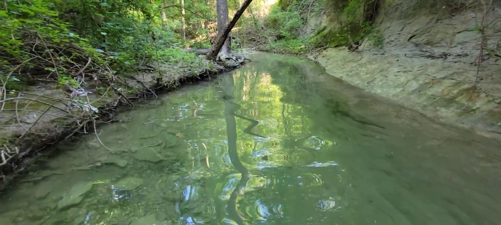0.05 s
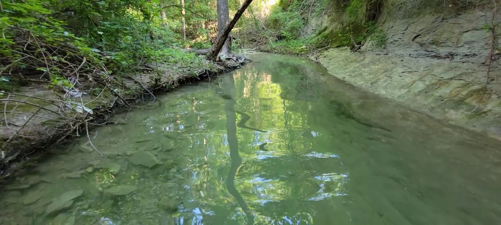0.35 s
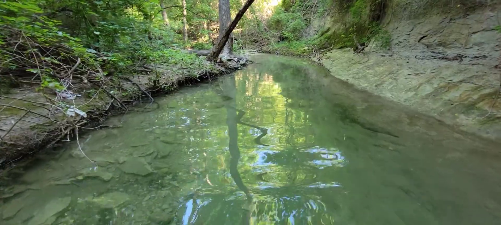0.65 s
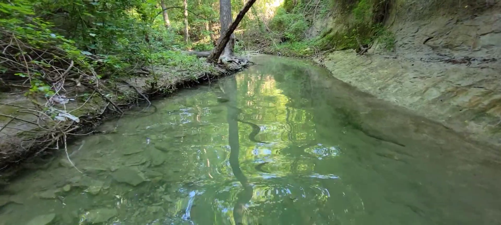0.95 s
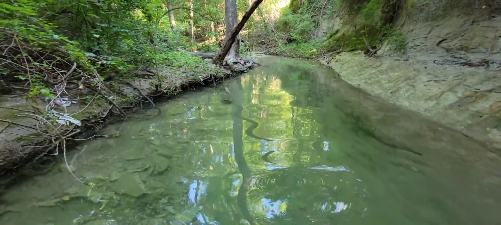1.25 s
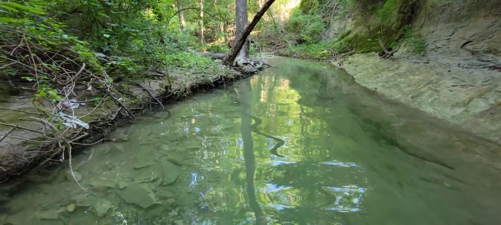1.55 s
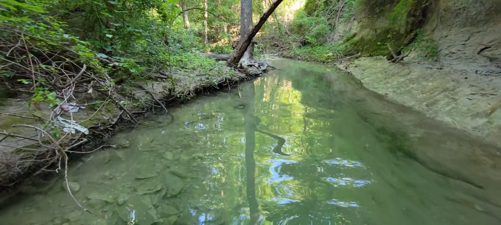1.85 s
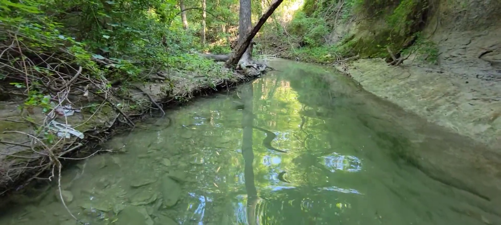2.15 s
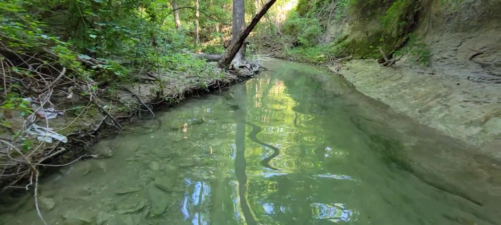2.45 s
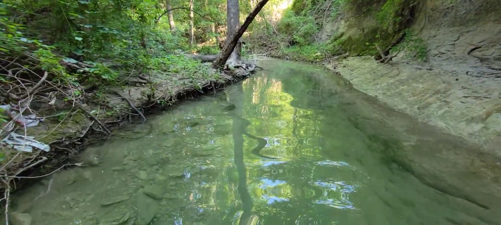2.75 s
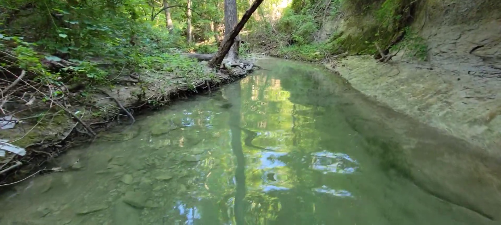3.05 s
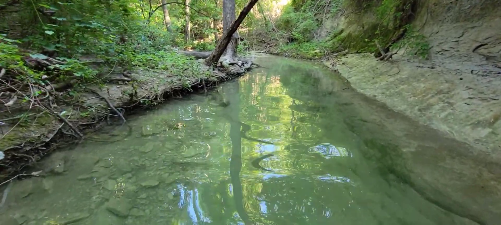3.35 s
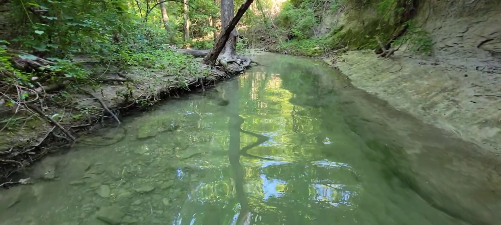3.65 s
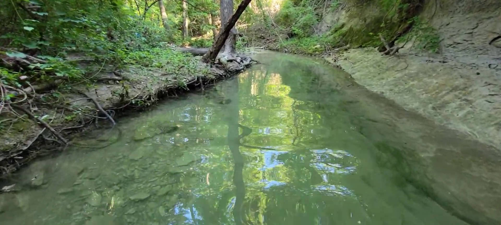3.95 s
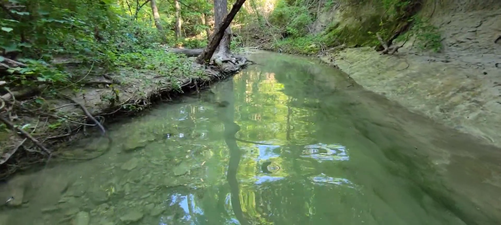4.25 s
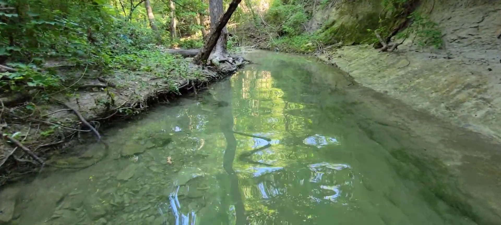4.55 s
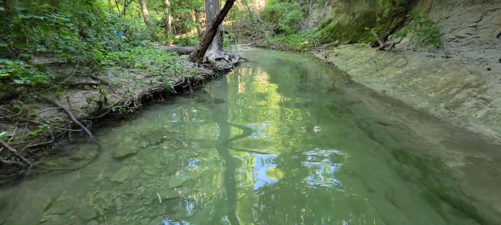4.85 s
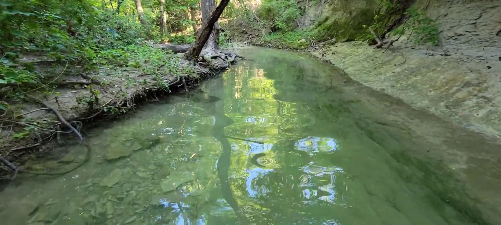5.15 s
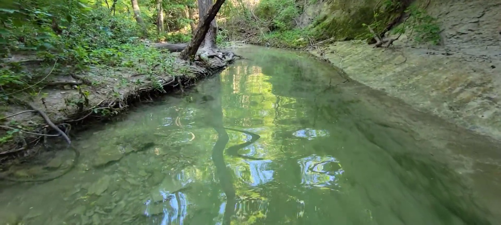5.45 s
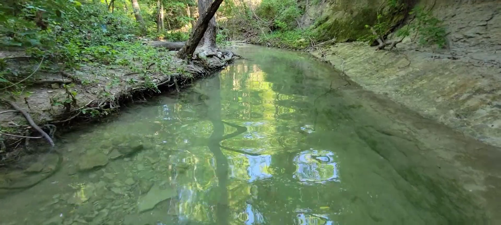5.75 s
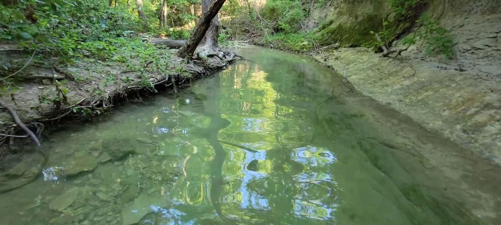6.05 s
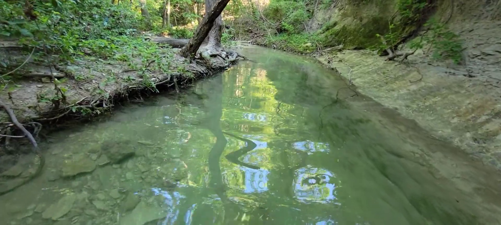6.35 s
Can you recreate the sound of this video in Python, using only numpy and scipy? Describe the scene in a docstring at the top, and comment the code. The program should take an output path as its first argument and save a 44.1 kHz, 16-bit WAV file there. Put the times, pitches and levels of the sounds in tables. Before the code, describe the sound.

Someone wades slowly through shallow water with uneven sloshes, bubbly plops and small splashes over a faint trickle and low rumble.

```python
"""A shallow creek between rock banks: slow wading, close to a hand-held stereo microphone.
Each leg pushes a wave that folds air into gurgles and ringing bubbles. Thrown water slaps the surface,
drops fall back between the steps, and once two stones clack together underfoot, to the right.
The banks give a short echo. A far bird whistles; a low rumble and a faint trickle lie under it all."""
import sys
import numpy as np
from scipy import signal
from scipy.fft import rfft, irfft, next_fast_len
from scipy.io import wavfile
from scipy.ndimage import uniform_filter1d, map_coordinates

SR = 44100
rng = np.random.default_rng(int(sys.argv[2]) if len(sys.argv) > 2 else 0)


def wrap_up_sound(samples):
    """Save the sound to the file named by the first command line argument, as 16-bit audio."""
    columns = np.atleast_2d(samples).T
    # keep every value between -1 and 1, then stretch to whole-number steps
    tamed = np.clip(columns, -1, 1)
    steps = np.round(tamed * 32767).astype(np.int16)
    wavfile.write(sys.argv[1], SR, steps)


N = 283122


def amp(db):
    """Decibels to gain."""
    return 10 ** (np.asarray(db) / 20)


def unit(x):
    """Scale to rms 1."""
    return x / np.sqrt(np.mean(x ** 2) + 1e-20)


def along(points, hz):
    """(frequency [Hz], value) points read on a log axis."""
    freqs, values = np.transpose(points)
    return np.interp(np.log(hz + 1), np.log(freqs + 1), values)


def curve(rows, column):
    """One value per sample from a column of a time table."""
    rows = np.asarray(rows)
    return np.interp(np.arange(N) / SR, rows[:, 0], rows[:, column])


def filtered(x, response):
    """x times a complex response of frequency."""
    size = next_fast_len(N + SR // 2)
    return irfft(rfft(x, size) * response(np.fft.rfftfreq(size, 1 / SR)), size)[..., :N]


def coloured(x, colour):
    """x filtered by (frequency [Hz], gain [dB]) points."""
    return filtered(x, lambda hz: amp(along(colour, hz)))


def add(track, s, sound):
    """Mix a sound into a track at s seconds."""
    start = int(np.clip(round(s * SR), 0, N - 1))
    track[..., start:start + sound.shape[-1]] += sound[..., :N - start]


def rush(colour, side_db, patchy_db):
    """Mid-side stereo noise of rms 1 with short patches of random gain."""
    spectra = signal.stft(rng.standard_normal((2, N)), nperseg=256)[2]
    patches = uniform_filter1d(rng.standard_normal(spectra.shape[1:]), size=5, axis=0)
    patches = unit(uniform_filter1d(patches, size=5, axis=1))
    pair = signal.istft(spectra * amp(patchy_db * patches), nperseg=256)[1][:, :N]
    mid, side = coloured(pair, colour)
    return unit(np.array([mid + amp(side_db) * side, mid - amp(side_db) * side]))


def bubble(hz, t60, rise, lag_s, swell_cycles):
    """An air pocket swells and rings, its pitch climbing as it nears the surface. Left lags by lag_s."""
    delay = np.array([[lag_s], [-lag_s]]) / 2 + abs(lag_s) / 2
    t = np.maximum(np.arange(int(t60 * SR) + 16) / SR - delay, 0)
    swell = 1 - np.exp(-t * hz / swell_cycles)
    phase = 2 * np.pi * hz * (t + rise * t * t / (2 * t60))
    return swell * amp(-60 * t / t60) * np.sin(phase)


def swarm(level_db, low_hz, high_hz, cycles, rise, scatter_db, spread_s, count):
    """Many bubbles following a level curve: stirred water makes both more and louder ones."""
    density = amp(level_db - level_db.max())
    share = np.cumsum(density) / density.sum()
    track = np.zeros((2, N))
    for k, (when, pitch, life, climb, loud, place) in enumerate(rng.random((count, 6))):
        onset = min(np.searchsorted(share, (k + when) / count), N - 1)
        hz = low_hz * (high_hz / low_hz) ** pitch
        t60 = cycles / hz * 2 ** (2 * life - 1)
        edge = np.sin(np.pi * pitch) ** .5  # the largest and smallest bubbles are weak
        gain = edge * amp(scatter_db * loud ** 2) / np.sqrt(density[onset])
        ring = bubble(hz, t60, rise * climb, spread_s * (2 * place - 1), swell_cycles=11)
        add(track, onset / SR, gain * ring)
    return unit(track) * amp(level_db)


# each push of a leg, close to the microphone:
# (crest time [s], stir level [dB], spray level [dB], build-up [s], side [-1 right, 1 left])
LEG_PUSHES = [(0.36, -37.5, -44.5, .2, -1.15), (1.0, -33, -40, .11, 0.24), (1.3, -41, -51, .15, -0.3),
              (1.59, -34, -46, .6, -0.72), (2.24, -43.5, -47.5, .3, -0.46), (2.48, -44, -53.5, .1, -0.98),
              (3.75, -29, -42, .24, -0.48), (4.48, -41, -45, .17, -0.91), (4.9, -40, -48, .6, -0.86),
              (6.17, -35, -40.5, .08, -0.096), (6.29, -33.5, -41, .2, 0.18)]
BUILD_DB = 17  # swell over the build-up


def strides(column, calm_db, settle_db_per_s):
    """Level in dB of the stir or the spray: it builds to each crest, then settles towards calm water."""
    power = amp(calm_db) ** 2
    for push in LEG_PUSHES:
        crest_s, build_s = push[0], push[3]
        since = np.arange(N) / SR - crest_s
        drop_db = np.maximum(-since * BUILD_DB / build_s, since * settle_db_per_s)
        power += amp(push[column] - drop_db) ** 2
    return 10 * np.log10(power)


# swish of the wave at the leg: (frequency [Hz], level [dB])
SWISH_COLOUR = [(250, -30), (500, 15.5), (1000, 4), (1900, 14.5), (2800, -6), (7000, -13), (12000, -25)]


def sloshes(stir_db, spray_db):
    """Big pockets gurgle behind the leg, smaller ones fill the wave, the finest fizz in the spray."""
    gurgle = swarm(stir_db - 8.5, 345.8, 1153, cycles=30.3, rise=1, scatter_db=7,
                   spread_s=.0002, count=210)
    slosh = swarm(stir_db - 4, 663.5, 2498, cycles=24.7, rise=1.035, scatter_db=14.5,
                  spread_s=.00036, count=620)
    fizz = swarm(spray_db, 1900, 9000, cycles=9, rise=.3, scatter_db=11, spread_s=.0002, count=3600)
    fizz = coloured(fizz, [(3000, -3.5), (8000, -10)])
    push_db = stir_db - stir_db.max()  # only a hard push makes the wave swish
    swish = amp(stir_db + .25 * push_db - 8.5) * rush(SWISH_COLOUR, side_db=-3, patchy_db=4)
    return gurgle + slosh + fizz + swish


# the loudest bubbles, at close range: (time [s], level [dB], pitch [Hz], t60 [s])
NEAR_BUBBLES = [(0.005, -35, 450, 0.3), (0.081, -19, 2820, 0.0076), (0.229, -35, 4220, .025),
                (0.252, -28.5, 366.5, 0.25), (0.285, -27, 1660, .035), (0.317, -25, 553, 0.21),
                (0.349, -19.5, 478, 0.065), (0.431, -31, 1605, 0.086), (0.449, -32, 508, 0.15),
                (0.523, -31, 1176, 0.058), (0.695, -34.5, 1105, .06), (0.913, -24, 3560, 0.018),
                (1.002, -18, 840, 0.025), (1.004, -18, 1750, 0.024), (1.244, -16, 1425, 0.024),
                (1.282, -24, 1540, 0.029), (1.296, -29.5, 535, 0.064), (1.368, -28.5, 944, 0.046),
                (1.441, -27, 4500, .02), (1.622, -20.5, 844, 0.036), (1.677, -21.5, 990, 0.026),
                (2.423, -29, 960, 0.043), (2.457, -31.5, 798, 0.079), (2.459, -34.5, 468, 0.16),
                (2.538, -26.5, 666, 0.051), (2.669, -33, 873, 0.06), (2.814, -24, 1750, 0.036),
                (2.816, -31, 936, 0.079), (3.035, -23.5, 2150, 0.028), (3.104, -26, 1640, 0.059),
                (3.297, -28, 3520, 0.019), (3.512, -20, 1420, 0.019), (3.558, -26, 361, 0.41),
                (3.75, -19.5, 1180, 0.052), (3.799, -25.5, 2670, 0.022), (3.803, -26, 503, 0.19),
                (3.848, -22, 1090, 0.033), (3.955, -17, 1930, 0.019), (4.297, -25, 1560, 0.026),
                (4.496, -18, 1090, 0.039), (4.535, -24.5, 4820, 0.0072), (4.661, -23, 1580, 0.029),
                (4.739, -26.5, 510, 0.13), (4.823, -12.5, 845, 0.012), (4.938, -23, 666, 0.051),
                (5.13, -30.5, 530, 0.15), (5.131, -24.5, 1625, 0.022), (5.43, -21.5, 1570, 0.017),
                (5.452, -18.5, 2660, 0.0087), (5.524, -29.5, 1600, 0.026), (6.099, -23, 1495, 0.086),
                (6.144, -20, 2200, 0.032), (6.198, -20, 1080, 0.07), (6.317, -22.5, 339, 0.059),
                (6.377, -15, 1818, 0.026)]


def plops():
    """Single bubbles, each from its own spot around the legs, pinch off at once and ring out."""
    track = np.zeros((2, N))
    for (s, db, hz, t60), place in zip(NEAR_BUBBLES, rng.standard_normal(len(NEAR_BUBBLES))):
        add(track, s, amp(db) * bubble(hz, t60, rise=.282, lag_s=.00004 * place, swell_cycles=.6))
    return track


# hollows just behind the legs: (time [s], level [dB], first pitch [Hz], last pitch [Hz], length [s])
WAKE_HOLLOWS = [(0.236, -18.5, 954, 1540, 0.015), (0.253, -25, 1130, 1620, .019),
                (0.855, -29, 573, 710, 0.035), (0.907, -34.5, 304, 377, 0.069),
                (0.963, -32, 430, 810, 0.039), (1.023, -28.5, 632, 785, 0.05),
                (1.444, -28, 1776, 2260, 0.038), (1.579, -18, 906, 1270, 0.027),
                (3.421, -25, 1070, 2150, 0.026), (3.668, -24, 520, 780, 0.027),
                (3.694, -24.5, 955, 1900, 0.019), (4.444, -31.5, 488, 780, 0.038),
                (4.775, -28, 407, 715, 0.047), (4.834, -35.5, 327, 550, 0.053),
                (4.876, -27, 573, 1240, 0.021), (6.31, -22, 805, 1240, 0.028)]


def gulps():
    """A hollow closes over: its note swells, wavers and climbs ever faster as the cavity shrinks."""
    track = np.zeros((2, N))
    for s, db, first_hz, last_hz, length in WAKE_HOLLOWS:
        progress = np.linspace(0, 1, int(length * SR))
        waver = unit(uniform_filter1d(rng.standard_normal(len(progress)), size=90))
        hz = first_hz * (last_hz / first_hz) ** (progress ** 2) * (1 + .07 * waver)
        swell = np.sin(np.pi * progress ** .88) ** 2
        add(track, s, amp(db) * swell * np.sin(2 * np.pi * np.cumsum(hz) / SR))
    return track


# thrown water landing nearby, and a foot going under: (time [s], level [dB])
SLAP_HITS = [(0.239, -39), (0.999, -41.5), (1.992, -39), (3.625, -37.5), (4.655, -39.5), (6.064, -36.5)]
PLUNGE_HITS = [(0.999, -29), (1.448, -32), (1.62, -32), (3.68, -30), (3.748, -33), (6.319, -25.5)]
# their spectra: (frequency [Hz], level [dB])
SLAP_SPECTRUM = [(700, -9), (2000, 4.5), (4200, 2.5), (6500, -4), (12000, -38)]
PLUNGE_SPECTRUM = [(200, -18), (330, -5.5), (1100, 4.5), (2100, 5), (3000, -26.5)]


def splashes():
    """Thrown water slaps the surface in a bright burst; a plunging foot drives air under in a deep one."""
    return burst(SLAP_HITS, SLAP_SPECTRUM, t60=.17) + burst(PLUNGE_HITS, PLUNGE_SPECTRUM, t60=.15)


def burst(hits, colour, t60):
    """Patchy noise that starts at each hit on the water and dies away."""
    envelope, t = np.zeros(N), np.arange(SR // 5) / SR
    for s, db in hits:
        add(envelope, s, amp(db - 60 * t / t60))
    return envelope * rush(colour, side_db=-4.5, patchy_db=1.5)


def drips(stir_db):
    """Water running off the legs falls back in small rising chirps, also between steps."""
    return swarm(.5 * stir_db - 35, 750, 2300, cycles=45, rise=1.1, scatter_db=5, spread_s=.0002, count=65)


# droplets near the microphone: (time [s], level [dB])
DROPLETS = [(0.439, -31), (0.815, -35), (1.58, -29.5), (1.614, -29), (2.6486, -32.5), (2.843, -37),
            (3.31, -36), (3.865, -29.5), (4.9353, -33), (6.059, -34.5), (6.131, -30)]


def ticks(t60=.009):
    """Tiny droplets burst in a bright click."""
    track, t = np.zeros((2, N)), np.arange(SR // 50) / SR
    for s, db in DROPLETS:
        add(track, s, amp(db - 3 - 60 * t / t60) * rng.standard_normal((2, len(t))))
    return coloured(track, [(1500, -31), (5000, 10), (13000, 6)])


# the finest hiss, close and dry: (time [s], level [dB])
HISS_LEVEL = [(0.0, -51), (0.72, -61), (1.29, -55), (1.9, -63), (2.1, -55.5), (2.38, -57), (2.62, -64),
              (3.25, -65.5), (3.81, -51), (4.09, -61.5), (4.6, -51.5), (4.85, -60), (6.06, -63),
              (6.24, -45.5), (6.42, -63)]
# its spectrum: (frequency [Hz], level [dB])
HISS_SPECTRUM = [(3000, -5), (6000, 7.5), (9000, 2), (12500, 7.5), (15500, 5)]


def crackle(pops_per_s=900, t60=.0078):
    """Countless tiny pops over a hiss, swelling and fading together."""
    sizes = (rng.random(N) < pops_per_s / SR) * amp(7.5 * rng.standard_normal(N).clip(-3, 2.5))
    t = np.arange(SR // 400) / SR
    envelope = signal.fftconvolve(sizes, amp(-60 * t / t60))[:N]
    pops = unit(coloured(envelope * rng.standard_normal((2, N)), HISS_SPECTRUM))
    hiss = rush(HISS_SPECTRUM, side_db=-9, patchy_db=7.5)
    return amp(curve(HISS_LEVEL, 1)) * (amp(.5) * pops + hiss)


# ring of the stones underfoot: (frequency [Hz], level [dB], t60 [s])
STONE_MODES = [(1070, -19.5, 0.033), (2160, -13, 0.013), (2540, -11, .011), (2850, -2.5, 0.015),
               (3720, -9.5, 0.011), (4310, -4.5, 0.0076), (4700, -13, 0.0073), (6000, -12, 0.0094),
               (11950, -2.5, 0.0022)]


def stones(clack_s=5.8314):
    """One stone tips against another: all modes start with the blow; water and banks scatter the clack."""
    track, t = np.zeros((2, N)), np.arange(SR // 4) / SR
    ring = sum(amp(db + rng.standard_normal((2, 1)) - 60 * t / t60) * np.sin(2 * np.pi * hz * t)
               for hz, db, t60 in STONE_MODES)
    grit = rush(SLAP_SPECTRUM, side_db=1, patchy_db=.5)[:, :len(t)]
    contact = amp(-8.5 - 60 * t / .0089)
    scatter = amp(-27 - 60 * t / .15)
    attack = 1 - np.exp(-t / .00027)
    add(track, clack_s, attack * (amp(-2.5) * ring + (contact + scatter) * grit))
    return track


# echo of the rock banks, heard from in the creek: (frequency [Hz], t60 [s])
BANK_DECAY = [(200, 0.54), (1000, 0.24), (4000, 0.085), (12000, 0.061)]


def banks(x):
    """Water surface and rock answer; each stretch of the walk has its own echo."""
    wet, hop = np.zeros((2, N)), SR // 4
    for start in range(0, N, hop):
        hz, t, spectra = signal.stft(rng.standard_normal((2, SR // 3)), SR, nperseg=256)
        decay = amp(-60 * t / along(BANK_DECAY, hz)[:, None])
        tail = signal.istft(spectra * decay, SR, nperseg=256)[1]
        tail *= 1 + 2.5 * np.exp(-np.arange(tail.shape[1]) / SR / .035)  # the wader's body is nearest
        crossfade = np.clip(1 - abs(np.arange(N) - start) / hop, 0, 1)
        first = max(start - hop, 0)
        stretch = (x[0] * crossfade)[None, first:start + hop]
        add(wet, first / SR, signal.fftconvolve(stretch, tail / np.linalg.norm(tail[0]), axes=1))
    return wet


# a far bird's phrase: (offset [s], length [s], first pitch [Hz], last pitch [Hz], level [dB])
BIRD_PHRASE = [(0, .12, 2500, 1880, -43.5), (.18, .11, 3480, 3420, -54.5), (.29, .115, 4200, 5600, -55)]


def bird(start_s=4.125, period_s=.51, count=4):
    """A far songbird repeats three whistles, falling, held and rising, smeared by the banks."""
    song = np.zeros((2, N))
    for phrase_s in start_s + period_s * np.arange(count):
        for s, length, first_hz, last_hz, db in BIRD_PHRASE:
            progress = np.linspace(0, 1, int(length * SR))
            hz = first_hz * (last_hz / first_hz) ** progress * (1 + .0082 * rng.standard_normal())
            whistle = np.sin(np.pi * progress) * np.sin(2 * np.pi * np.cumsum(hz) / SR)
            add(song, phrase_s + s, amp(db) * whistle)
    return (song + banks(song)) / 2


# the steady ambience of the place: (frequency [Hz], level [dB])
RUMBLE_COLOUR = [(20, -23), (58, -3.5), (80, 0.5), (130, -1), (160, -10.5), (400, -23), (900, -58.5)]
TRICKLE_COLOUR = [(200, -4), (400, 2), (1200, 2.5), (2500, -2), (5000, -21), (9000, -25.5), (15500, -61)]


def ambience():
    """A low rumble with a faint hum in it, and the far trickle of the creek."""
    rumble = amp(-43) * rush(RUMBLE_COLOUR, side_db=-29, patchy_db=1)
    hum = amp(-48.5) * np.sin(2 * np.pi * 59 * np.arange(N) / SR)
    trickle = amp(-45.5) * rush(TRICKLE_COLOUR, side_db=-1, patchy_db=3)
    return rumble + hum + trickle


def placed(x, side, louder_db=4.5, earlier_s=.0003):
    """A sound to one side (-1 right, 1 left) is louder and earlier at the nearer microphone port."""
    nearness = side * np.array([[.5], [-.5]])
    leads = nearness * earlier_s * SR
    shifted = [map_coordinates(port, [np.arange(N) + lead]) for port, lead in zip(x, leads)]
    return amp(louder_db * nearness) * np.array(shifted)


def scene():
    """Water and stones up close, the banks around them, bird and ambience beyond."""
    stir_db = strides(column=1, calm_db=-50, settle_db_per_s=52)
    spray_db = strides(column=2, calm_db=-56, settle_db_per_s=36.5)
    wash = sloshes(stir_db, spray_db) + drips(stir_db) + splashes()
    near = plops() + gulps() + ticks()
    echo = banks(amp(-2) * wash + amp(-4.5) * near)
    water = placed(wash + near, side=curve(LEG_PUSHES, column=4))
    return water + echo + crackle() + placed(stones(), side=-.69) + bird() + ambience()


# response of the hand-held microphone: (frequency [Hz], gain [dB])
MIC_COLOUR = [(2000, 0), (2400, -1.5), (3000, 4.5), (6000, 6.5), (9800, 5.5), (10900, -6), (11800, 2.5)]
# its left port against its right: (frequency [Hz], level [dB]) and (frequency [Hz], phase lead [rad])
MIC_BALANCE = [(100, -1.1), (400, -0.5), (800, -3), (1300, -4), (2000, -3.5), (3000, -0.5), (5000, -2),
               (15000, 3)]
MIC_PHASE = [(300, 0.31), (1150, 0.14), (1550, 2.55), (2100, 0.9), (2800, 1.9), (3700, -0.63), (6000, 1.36)]
TOP_HZ = 16250


def record(dry):
    """Each port colours and delays the sound in its own way; overloads flatten and the top is cut."""
    def ports(hz):
        half = np.array([[.5], [-.5]])
        gain = amp(along(MIC_COLOUR, hz) + half * along(MIC_BALANCE, hz))
        return gain * np.exp(1j * half * along(MIC_PHASE, hz))

    limited = np.clip(filtered(dry, ports), -1, 1)
    return filtered(limited, lambda hz: 1 / (1 + (hz / TOP_HZ) ** 200))


dry = scene()
out = record(dry)
wrap_up_sound(out)
```